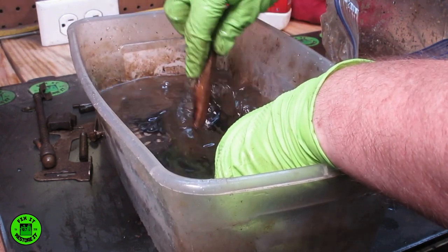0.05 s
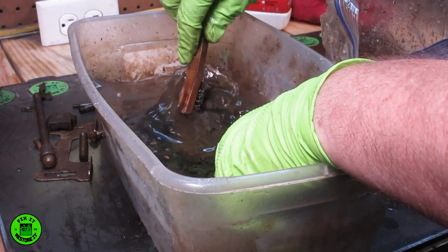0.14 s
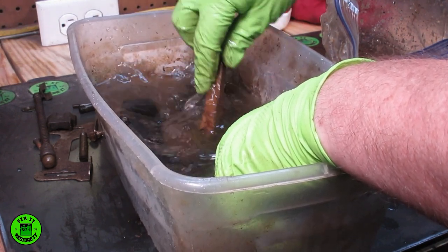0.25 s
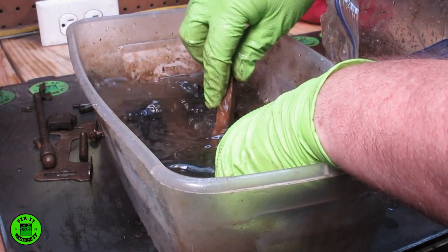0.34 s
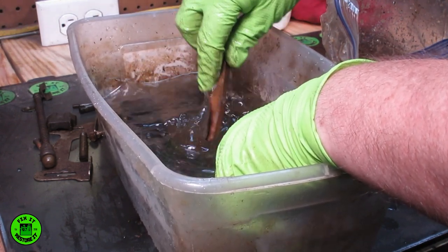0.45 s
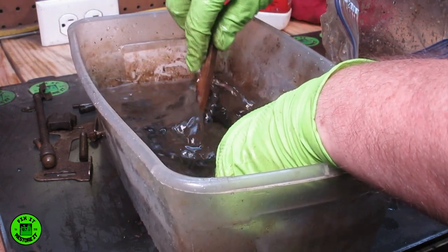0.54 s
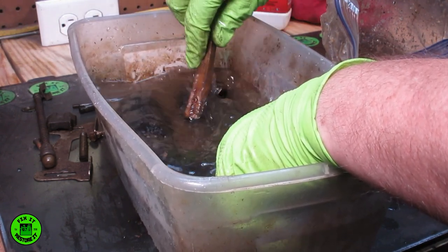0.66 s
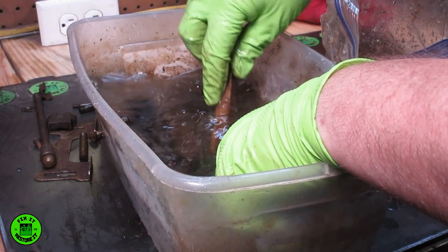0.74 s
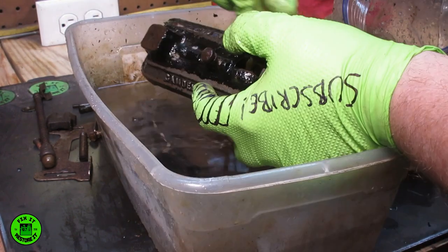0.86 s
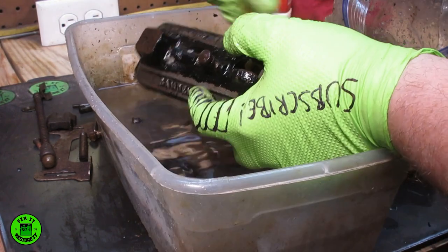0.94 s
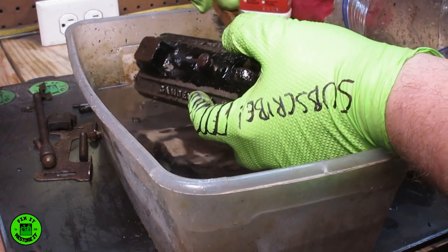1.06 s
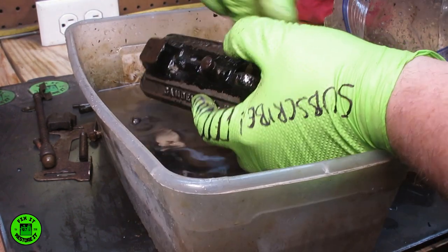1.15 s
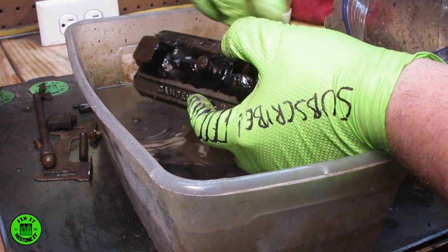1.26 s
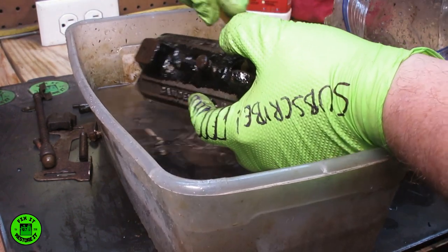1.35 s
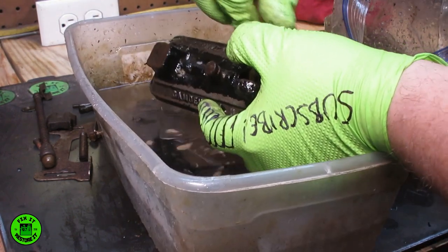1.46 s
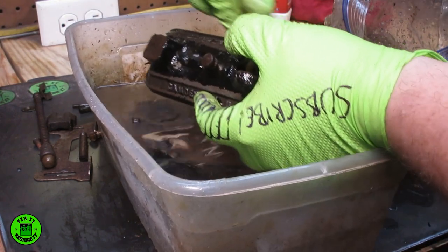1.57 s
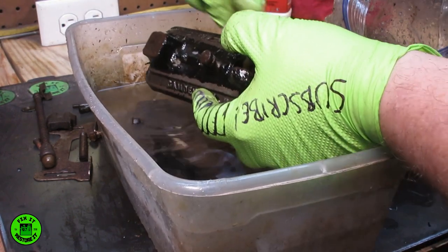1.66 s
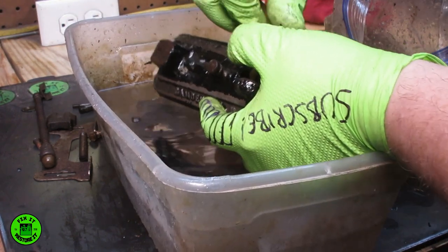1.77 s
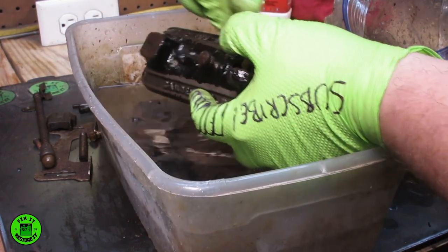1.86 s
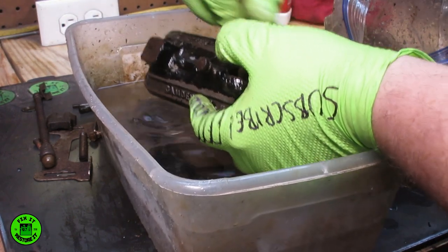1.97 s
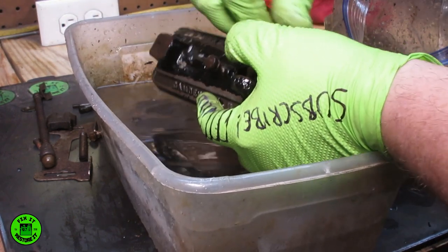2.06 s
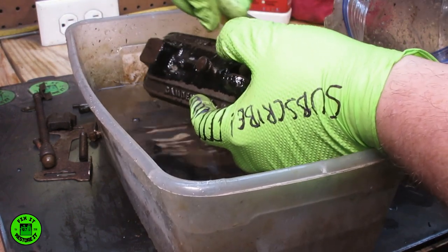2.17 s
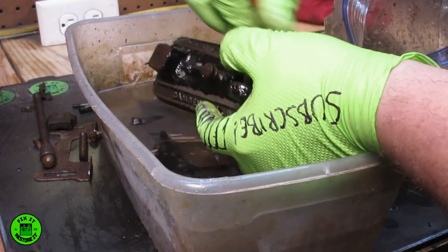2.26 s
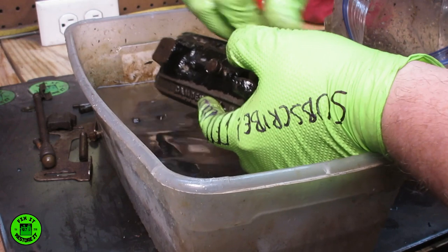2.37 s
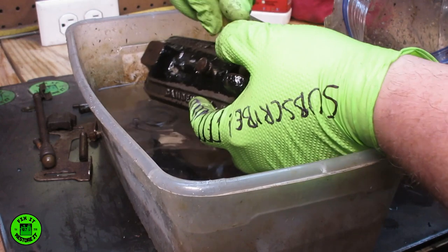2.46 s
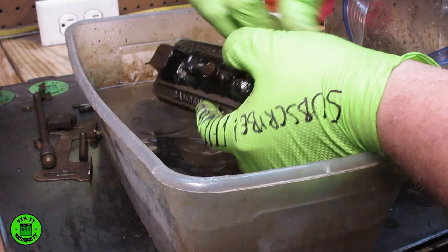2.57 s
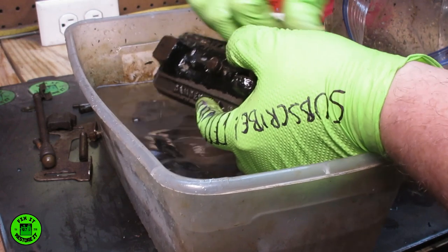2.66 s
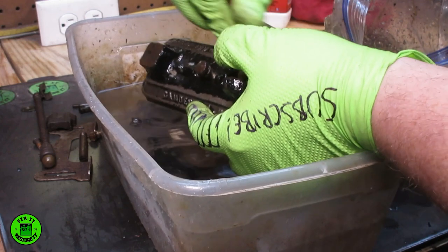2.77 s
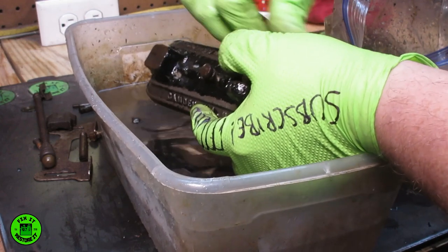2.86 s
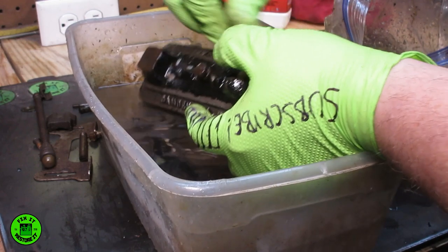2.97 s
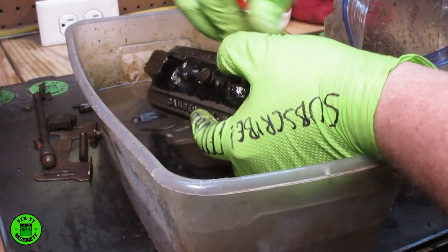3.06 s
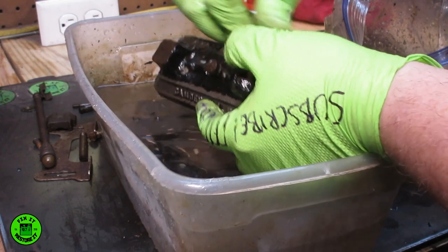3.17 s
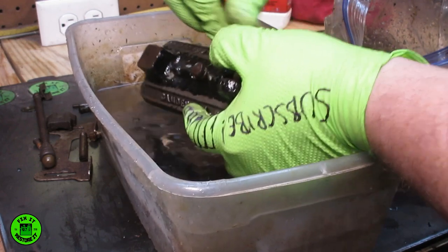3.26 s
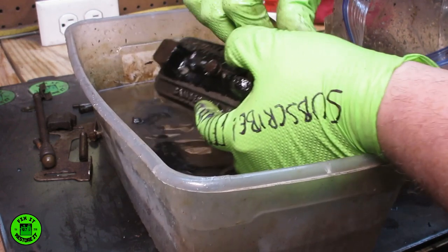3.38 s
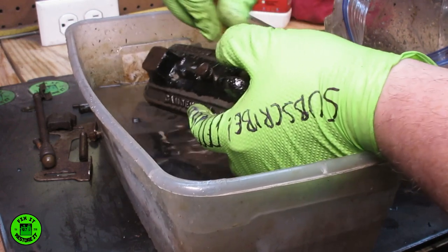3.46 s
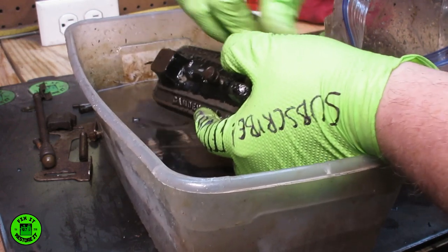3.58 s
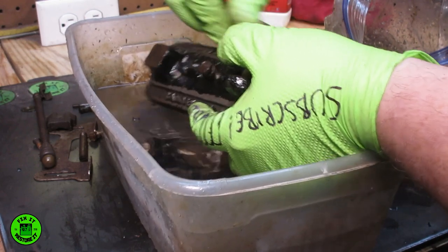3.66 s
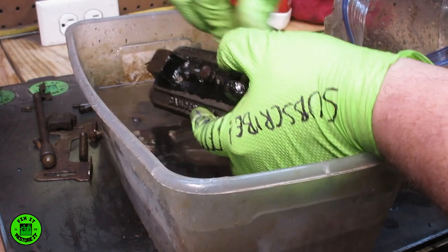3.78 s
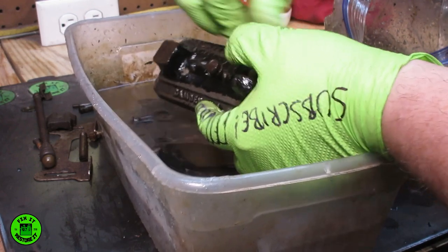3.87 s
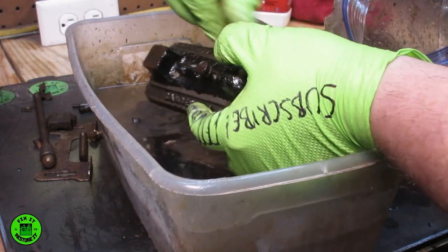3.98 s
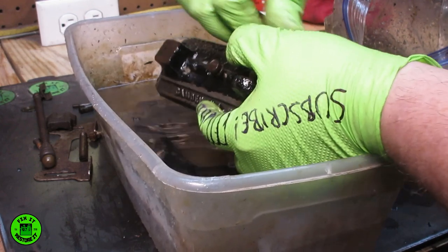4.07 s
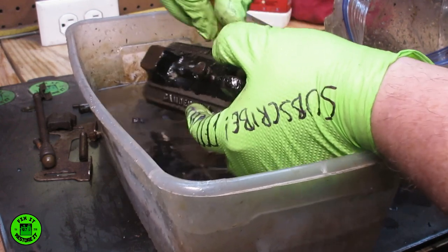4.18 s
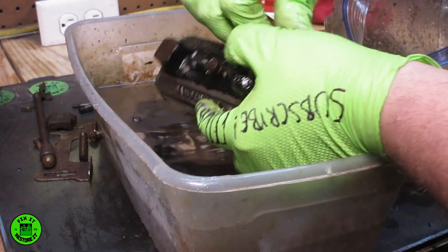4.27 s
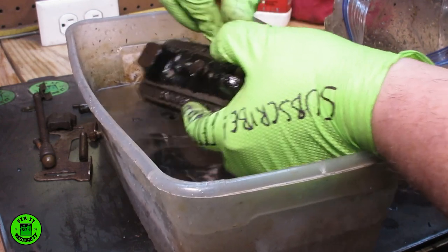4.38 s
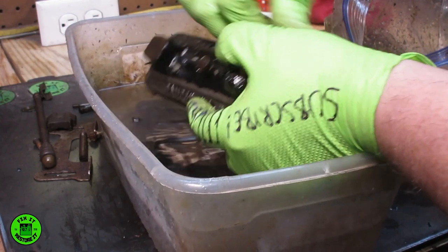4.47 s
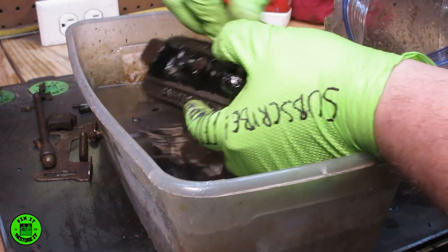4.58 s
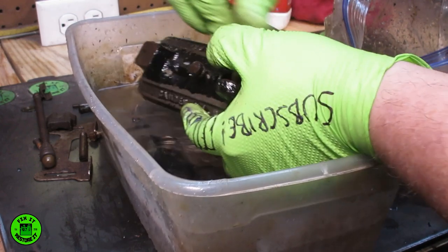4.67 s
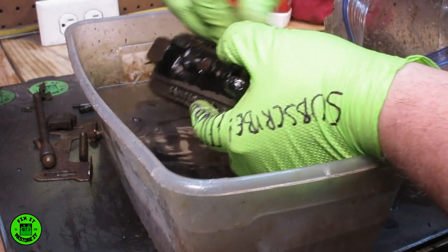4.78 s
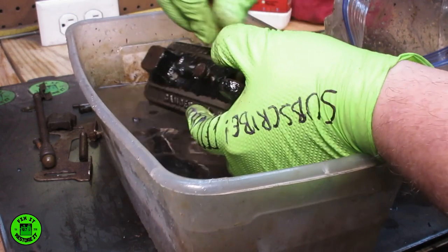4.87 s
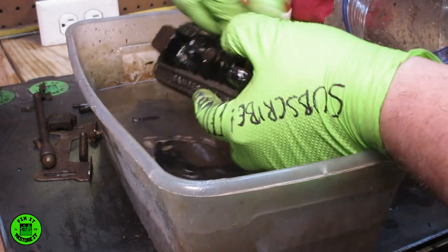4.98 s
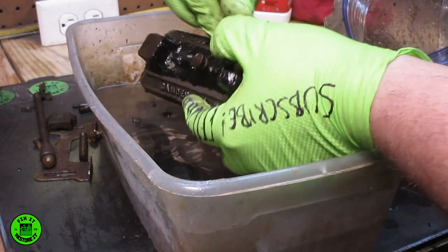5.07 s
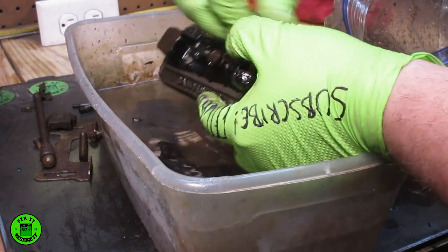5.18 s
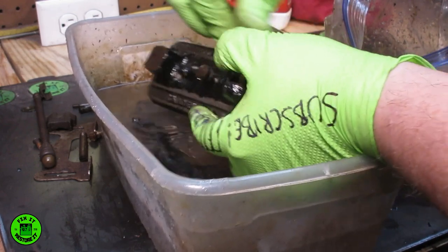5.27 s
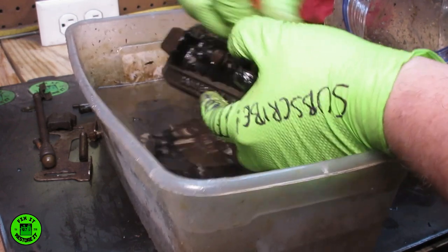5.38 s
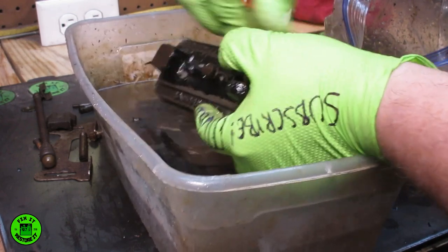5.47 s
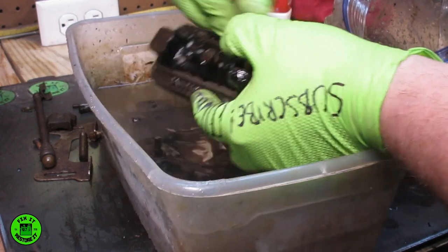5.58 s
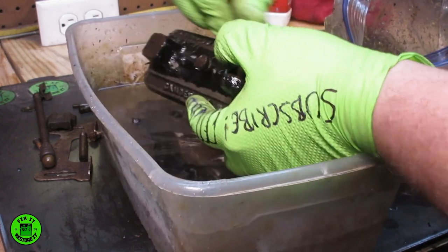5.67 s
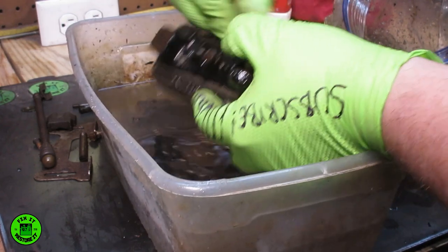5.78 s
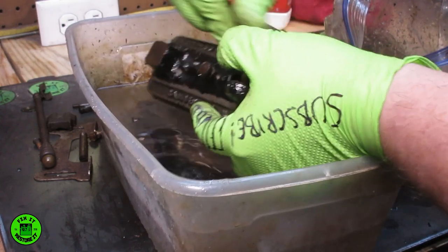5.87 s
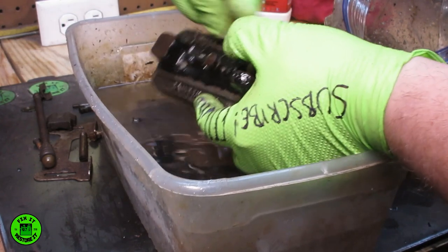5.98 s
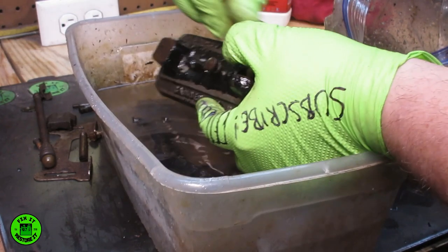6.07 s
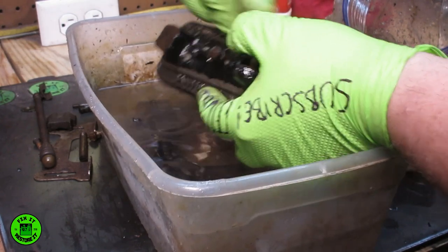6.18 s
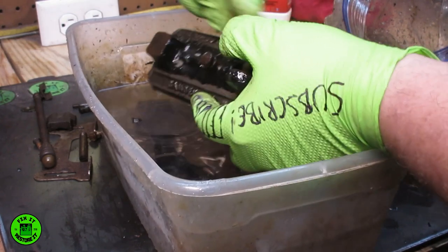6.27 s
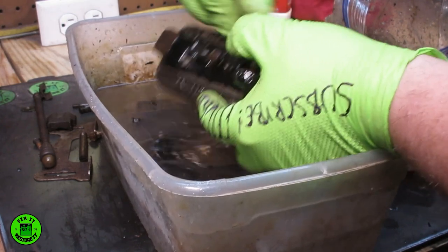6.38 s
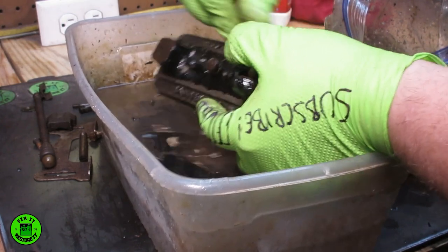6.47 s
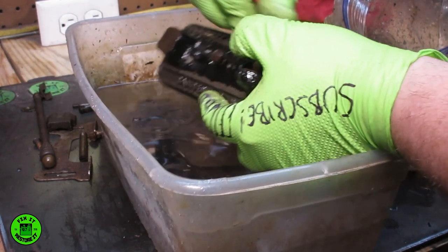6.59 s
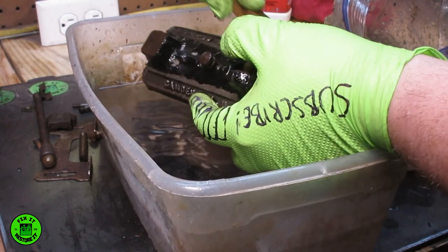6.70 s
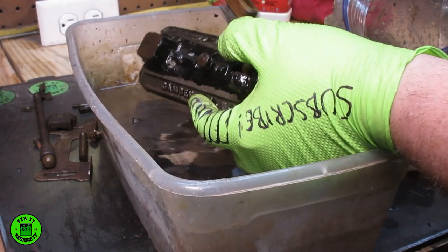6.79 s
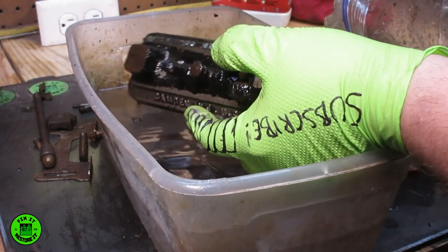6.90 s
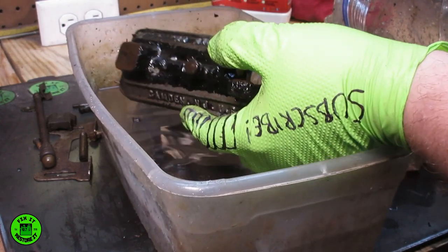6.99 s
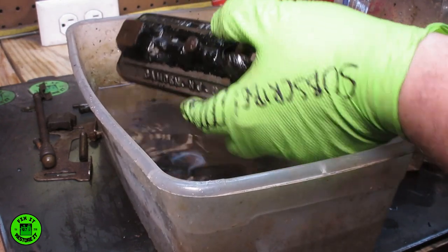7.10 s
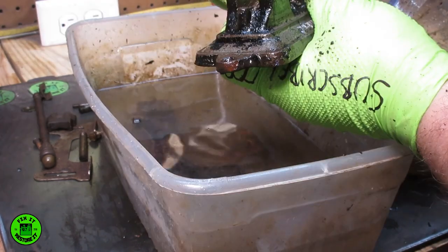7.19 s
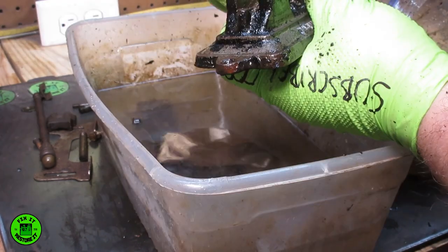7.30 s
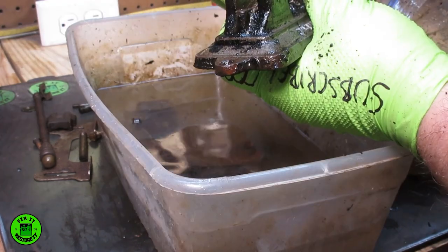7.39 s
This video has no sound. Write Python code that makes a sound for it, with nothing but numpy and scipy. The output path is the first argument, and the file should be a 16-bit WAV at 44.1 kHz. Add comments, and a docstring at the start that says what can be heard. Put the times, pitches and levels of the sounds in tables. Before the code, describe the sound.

Muffled underwater brushing and bubbles, a dull splash, then crisp wet bristles rasping to and fro on metal, ever quicker, ending in near silence.

```python
"""Dead-sounding workshop: a stiff brush scrubs a metal part in a plastic tub of water, close to one microphone.
Five muffled strokes run under water: filtered bristle clicks, with bubbles and gliding noise resonances as gurgles.
The part is lifted with a dull splash; the bristles slap onto it and rasp to and fro, brighter, quickening to
about ten strokes a second. Noise bursts make slaps, snaps and flips; decaying sines make the part's ring and drips.
Short echoes and a steady noise background complete it."""
import sys
import numpy as np
from scipy import signal
from scipy.fft import rfft, irfft
from scipy.io import wavfile
from scipy.ndimage import uniform_filter1d

SR = 44100
rng = np.random.default_rng(int(sys.argv[2]) if len(sys.argv) > 2 else 0)


def inscribe(sig):
    """Save sig as 16-bit PCM at rate SR to the path in sys.argv[1].

    A 1-D sig is mono; a 2-D sig holds one channel per row.
    Samples are clipped to [-1, 1] before scaling.
    """
    pcm = np.round(np.clip(np.atleast_2d(sig).T, -1, 1) * 32767)
    wavfile.write(sys.argv[1], SR, pcm.astype(np.int16))


N = 328094
TIME_S = np.arange(N) / SR

# workshop background spectrum: (frequency [Hz], relative level [dB])
FLOOR = [(25, -17), (50, -0.5), (80, -6.5), (113, 1.5), (150, -7), (240, -4.5), (330, -11.5), (520, -11),
         (1000, -13.5), (2000, -19.5), (3000, -19.5), (5000, -26.5), (8000, -29), (15000, -39)]
# strokes under water, each lasting until the next: (start time [s], relative mid-stroke level [dB])
STROKES_IN_WATER = [(-0.08, -33.5), (0.066, -33), (0.234, -31.5), (0.481, -33), (0.691, -32.5)]
# rasp spectra: (frequency [Hz], relative level [dB])
RASP_IN_WATER = [(120, -29), (250, -12), (500, -14.5), (1100, -11.5), (1700, -11), (2600, -3.5),
                 (3800, -5.5), (6000, -7.5), (8500, 0), (11000, -6), (15000, -16)]
RASP_IN_AIR = [(200, -28), (600, -26), (1100, -19.5), (1700, -14.5), (2200, -12.5), (2800, -6.5),
               (3600, -8.5), (4500, -4.5), (6000, -3), (7700, -0.5), (10000, -2.5), (12000, -4.5),
               (15000, -12)]
# resonances of the filled tub and of the metal part: (centre [Hz], width [Hz], lift [dB])
TUB_RESONANCES = [(927, 81, 16.5), (1170, 72, 14.5), (1340, 85, 13), (2480, 120, 6.5), (2770, 190, 4.5),
                  (3400, 70, 2), (4720, 160, 6)]
PART_RESONANCES = [(1427, 96, 4.9), (2557, 25, 5.6), (3190, 50, 5.2), (4070, 180, 5.5), (4666, 70, 4.8),
                   (4904, 380, 4.3), (5395, 76, 4), (5910, 97, 3.6), (7150, 74, 5.7), (7230, 70, 1.46),
                   (8270, 177, 1.87), (9550, 150, 3.1)]
# largest air pockets, churned up in the water or squeezed from the wet bristles:
# (time [s], length [s], relative rms level [dB], first pitch [Hz], last pitch [Hz])
GURGLES = [(0, 0.0174, -31, 2300, 2300), (0.287, 0.048, -40, 1500, 2380), (0.325, 0.012, -27.5, 2900, 2370),
           (0.342, 0.039, -37.5, 1890, 1090), (0.368, 0.041, -36, 1100, 2000),
           (0.811, 0.055, -30.5, 2750, 2000), (0.85, 0.039, -32, 2300, 2400),
           (0.876, 0.014, -25.5, 2540, 1860), (0.913, 0.0097, -35.5, 2350, 2300),
           (2.427, 0.017, -43, 2280, 2080), (2.719, 0.0156, -40, 2210, 2320),
           (4.764, 0.02, -33.5, 2250, 2130)]
# a tuft of bristles catches on an edge of the part and snaps free: (time [s], relative peak level [dB])
SNAPS = [(0.2484, -14), (1.3294, -14.5), (2.729, -5), (2.9017, -12), (3.2455, -13.5), (3.3646, -18),
         (4.8229, -8), (5.6531, -10), (6.054, -9)]
# scrubs on the lifted part, a push and a pull each, lasting until the next:
# (start time [s], relative push level [dB], relative pull level [dB])
SCRUBS = [(0.991, -24, -24.5), (1.306, -24, -26), (1.589, -23.5, -24.1), (1.857, -23.5, -27),
          (2.138, -20, -23), (2.416, -19.7, -22), (2.702, -19.5, -24), (2.967, -19, -22),
          (3.219, -21, -22.8), (3.462, -17.5, -21.5), (3.695, -19.5, -21), (3.921, -20, -20.5),
          (4.147, -20.4, -20.2), (4.374, -19.5, -21), (4.584, -19, -21.3), (4.803, -17.5, -19.5),
          (5.024, -18.5, -20.2), (5.225, -18, -21.5), (5.434, -17.6, -19), (5.638, -19.0, -20.5),
          (5.839, -18.5, -23.3), (6.031, -20, -21.5), (6.246, -21.5, -22.5), (6.439, -21, -22.5)]
# stroke shapes per direction, as pairs (at slow pace, at fast pace): top, place of top speed [0-1];
# firmness, how early the full rasp is reached [-]; dwell, lingering at the turns [-];
# turn_db, rustle at stroke start against the stroke [dB]; body_db, sheen_db, lows and highs against the middle [dB]
PUSH = dict(turn_db=(-25, -15), top=(0.66, 0.43), firmness=(0.87, 1.21), dwell=(1, 1.24),
        body_db=(-14.5, -16), sheen_db=(7, 7))
PULL = dict(turn_db=(-19, -14.5), top=(0.4, .51), firmness=(0.76, .3), dwell=(1.05, 1),
        body_db=(-10.5, -11.5), sheen_db=(4.5, 6.5))
# last light push, peaking early: start_s, stop_s, ease_off_s [s]; level_db [dB]; top, place of top speed [0-1]
LAST_PUSH = dict(start_s=6.648, stop_s=6.82, level_db=-26, top=0.34, ease_off_s=.06)
# lowest modes of the part, rung by the rubbing: (frequency [Hz], relative level [dB], ring time [s])
RING = [(1415, 1, .06), (2545, -3.5, .055), (3200, -3, .055)]
# drips from the lifted part: (time [s], peak level [dB], pitch [Hz], ring time [s])
DRIPS = [(6.929, -44, 4400, .012), (7.208, -40, 9000, .0015)]

LIFT_S = 0.93  # last stroke under water ends
SLOW_STROKES_PER_S, FAST_STROKES_PER_S = 6.2, 10.48
PUSH_SHARE = 0.5  # of the time of one scrub
FLIP_DELAY_S, FLIP_DB = 0.029, -19.5  # after each turn; level against the stroke
BAND_EDGE_HZ = 15080


def amp(db):
    """Decibels to gain."""
    return 10 ** (np.asarray(db) / 20)


def evened(x):
    """Scales to rms 1."""
    return x / np.sqrt(np.mean(x ** 2) + 1e-20)


def add(mix, start_s, sound):
    """Mixes a sound in at start_s, cut at the end of the mix."""
    part = mix[max(round(start_s * SR), 0):][:len(sound)]
    part += sound[:len(part)]


def band(x, low_hz, high_hz, order=12):
    """Keeps one band, with soft edges."""
    hz = np.fft.rfftfreq(N, 1 / SR) + 1
    high_pass = 1 + (low_hz / hz) ** order
    low_pass = 1 + (hz / high_hz) ** order
    return irfft(rfft(x) / high_pass / low_pass, N)


def colour(x, spectrum, resonances=(), size=8192):
    """Minimum-phase filter: smooth spectrum plus resonant peaks that ring on after each click."""
    hz = np.fft.rfftfreq(size, 1 / SR)
    spectrum_hz, spectrum_db = np.transpose(spectrum)
    db = np.interp(np.log(hz + 1), np.log(spectrum_hz), spectrum_db)
    for centre_hz, width_hz, lift_db in resonances:
        db = db + lift_db / (1 + (2 * (hz - centre_hz) / width_hz) ** 2)
    log_gain = np.log(amp(np.r_[db, db[-2:0:-1]]))
    causal_spectrum = np.exp(np.conj(signal.hilbert(log_gain)))
    response = np.fft.ifft(causal_spectrum).real[:size // 2]
    return evened(signal.oaconvolve(x, response)[:N])


def background():
    """Steady workshop noise, shaped by the floor spectrum."""
    return amp(-47) * colour(rng.standard_normal(N), FLOOR)


def flicks(per_s, spread_db):
    """Bristle tips catch and let go: a dense train of clicks of uneven size."""
    boost_db = spread_db * np.minimum(rng.exponential(1, N), 4)
    size = rng.standard_normal(N) * amp(boost_db)
    return size * (rng.random(N) < per_s / SR)


def uneven(depth_db, rate_hz):
    """A gain that wanders by chance, as tufts of bristles grip more or less."""
    return amp(depth_db * evened(band(rng.standard_normal(N), 9.7, rate_hz, order=4)))


def brush_motion(turns_s, shape, ease_off_s):
    """Brush speeds up and stops each stroke: loudness, mid-stroke gain, body, sheen, strokes done."""
    done = np.interp(TIME_S, turns_s, np.arange(len(turns_s)))
    k = np.minimum(done.astype(int), len(turns_s) - 2)
    level_db = shape["level_db"]
    firmness = shape["firmness"][k] + .01
    warp = np.log(.5) / np.log(shape["top"][k])  # puts top speed at "top"
    speed = np.sin(np.pi * (done - k) ** warp) ** 2
    # a firm stroke reaches its full rasp early
    grip = np.tanh(firmness * speed ** shape["dwell"][k]) / np.tanh(firmness)
    rustle_db = np.interp(TIME_S, turns_s[:-1], level_db + shape["turn_db"])
    loudness = amp(level_db[k]) * grip + amp(rustle_db) * (1 - speed)
    touch_down = uniform_filter1d(1. * (TIME_S >= turns_s[0]), size=400)
    ease_off = np.sqrt(np.clip((turns_s[-1] - TIME_S) / ease_off_s, 0, 1))
    loudness = np.abs(loudness * touch_down * ease_off)
    full, body, sheen = (uniform_filter1d(amp(shape[name][k]), size=600)
                         for name in ("level_db", "body_db", "sheen_db"))
    return loudness, full, body, sheen, done


def rasp(grain, motion, body_power, body_db, treble_db, tint_db=.5):
    """Treble follows loudness; body_power below 1 swells the lows earlier and longer; each stroke is tinted."""
    loudness, full, body, sheen, done = motion
    parts = band(grain, 20, 3500), band(grain, 3500, 6500), band(grain, 6500, 20000)
    stroke_tints = amp(tint_db * rng.standard_normal((int(done[-1]) + 1, len(parts))))
    tints = stroke_tints[done.astype(int)].T
    low, middle, high = (evened(part * tint * uneven(depth_db=1.12, rate_hz=32))
                         for part, tint in zip(parts, tints))
    treble = (middle + sheen * high) / np.sqrt(1 + sheen ** 2)
    body_loudness = full * (loudness / full) ** body_power
    return amp(treble_db) * loudness * treble + amp(body_db) * body * body_loudness * low


def bubbles(per_s, low_hz, high_hz, cycles, level_db, count=24):
    """Small bubbles of many sizes ping at random moments, each a decaying sine."""
    t, out = TIME_S[:SR // 20], np.zeros(N)
    pops = rng.uniform(-0.975, 1, N) * (rng.random(N) < per_s / SR)
    kind = rng.integers(0, count, N)
    for k, hz in enumerate(np.geomspace(low_hz, high_hz, count)):
        ping = np.sqrt(hz) * np.exp(-hz * t / cycles) * np.sin(2 * np.pi * hz * t)
        out += signal.oaconvolve(pops * (kind == k), ping)[:N]
    return amp(level_db) * evened(out)


def strokes_in_water():
    """Turn times and stroke shapes under water: all alike but for level."""
    starts_s, level_db = np.transpose(STROKES_IN_WATER)
    common = dict(turn_db=-22.5, top=.53, firmness=1.95, dwell=1.12, body_db=-3.0, sheen_db=0.9)
    shape = {name: np.full(len(starts_s), value) for name, value in common.items()}
    shape["level_db"] = level_db
    return np.r_[starts_s, LIFT_S], shape


def scrub_in_water():
    """Submerged bristles sound through the water and tub walls, and stir up small bubbles."""
    grain = colour(flicks(per_s=7800, spread_db=0.8), RASP_IN_WATER, TUB_RESONANCES)
    motion = brush_motion(*strokes_in_water(), ease_off_s=0.011)
    loudness = motion[0]
    churn = loudness * bubbles(per_s=160, low_hz=450, high_hz=3800, cycles=13, level_db=-12)
    return churn + rasp(grain, motion, body_power=1.0, body_db=-0.7, treble_db=-2.0)


def resonate(x, hz, width_hz):
    """A resonance that follows the curve hz: shift it down to zero, smooth twice, shift back."""
    turn = np.exp(2j * np.pi * np.cumsum(hz) / SR)
    r = np.exp(-np.pi * width_hz / SR)
    smooth = signal.lfilter([(1 - r) ** 2], [1, -2 * r, r * r], x / turn)
    return (turn * smooth).real


def gurgles(relative_width, level_db):
    """Each air pocket rings with the rush of water; its pitch glides as it shrinks or opens."""
    out = np.zeros(N)
    for start_s, length_s, db, first_hz, last_hz in GURGLES:
        hz = np.geomspace(first_hz, last_hz, round(length_s * SR))
        ring = resonate(rng.standard_normal(len(hz)), hz, relative_width * hz.mean())
        faded = ring * signal.windows.tukey(len(hz), .5)
        add(out, start_s, amp(db + level_db) * evened(faded))
    return out


def strokes_in_air():
    """Pushes and pulls alternate; pace sets their shape, and faster strokes leave shallower gaps."""
    scrubs = np.array(SCRUBS)
    push_s = np.r_[scrubs[:, 0], LAST_PUSH["start_s"]]
    pull_s = push_s[:-1] + PUSH_SHARE * np.diff(push_s)
    turns_s = np.sort(np.r_[push_s, pull_s, LAST_PUSH["stop_s"]])
    strokes_per_s = 1 / np.diff(turns_s)
    pulling = np.arange(len(turns_s) - 1) % 2

    def at_pace(pair):
        """Interpolates a (slow, fast) pair at each stroke's pace."""
        return np.interp(strokes_per_s, [SLOW_STROKES_PER_S, FAST_STROKES_PER_S], pair)

    shape = {name: np.where(pulling, at_pace(PULL[name]), at_pace(PUSH[name])) for name in PUSH}
    shape["level_db"] = np.r_[scrubs[:, 1:].ravel(), LAST_PUSH["level_db"]]
    shape["top"][-1] = LAST_PUSH["top"]
    return turns_s, shape


def bristle_bursts(slap_s, slap_db, slap_t60_s, snap_db, snap_t60_s, flip_t60_s):
    """Gain of sudden flick flurries: one slap as the brush lands, brief snaps, a flip after each turn."""
    out, t = np.zeros(N), TIME_S[:SR // 4]
    for start_s, db in SNAPS:
        add(out, start_s, amp(db + snap_db - 60 * t / snap_t60_s))
    add(out, slap_s, amp(slap_db - 60 * t / slap_t60_s))
    turns_s, shape = strokes_in_air()
    for turn_s, db in zip(turns_s[1:], shape["level_db"][1:]):
        add(out, turn_s + FLIP_DELAY_S, amp(db + FLIP_DB - 60 * t / flip_t60_s))
    return out


def plop(start_s, level_db, t60_s, low_hz, high_hz):
    """Water closes with a dull splash where the part leaves it: decaying band noise."""
    age_s = TIME_S - start_s
    splash = evened(band(rng.standard_normal(N), low_hz, high_hz, order=4))
    return (age_s > 0) * amp(level_db - 60 * np.abs(age_s) / t60_s) * splash


def part_ring(motion, level_db, reach, per_s, spread_db):
    """Bristles catch near the end of each push, unevenly from stroke to stroke, and the part rings on."""
    loudness, _, _, _, done = motion
    place = (1 - np.cos(np.pi * done)) / 2  # 1 where a push turns back
    catch = amp(spread_db * rng.random(int(done[-1]) + 1))[done.astype(int)]
    drive = catch * loudness ** .7 * place ** reach * flicks(per_s, spread_db=0.0)
    t = TIME_S[:SR // 2]
    modes = sum(amp(db - 60 * t / t60_s) * np.sin(2 * np.pi * hz * t) for hz, db, t60_s in RING)
    return amp(level_db) * evened(signal.oaconvolve(drive, modes)[:N])


def scrub_in_air():
    """Bristles slap onto the lifted part, rasp over it, squelch and set it ringing; snaps and flips punctuate."""
    grain = colour(flicks(per_s=26000, spread_db=0.82), RASP_IN_AIR, PART_RESONANCES)
    motion = brush_motion(*strokes_in_air(), ease_off_s=LAST_PUSH["ease_off_s"])
    loudness = motion[0]
    bursts = bristle_bursts(slap_s=.9228, slap_db=-23.5, slap_t60_s=0.17,
                            snap_db=-20, snap_t60_s=0.028, flip_t60_s=0.055)
    squelch = loudness * bubbles(per_s=40, low_hz=1690, high_hz=2986, cycles=26, level_db=-27.5)
    ring = part_ring(motion, level_db=-50.5, reach=1.1, per_s=900, spread_db=4)
    strokes = rasp(grain, motion, body_power=0.68, body_db=-2.3, treble_db=-0.43)
    return bursts * grain + squelch + ring + strokes


def drips():
    """Each drop gives one short dying sine ping."""
    out, t = np.zeros(N), TIME_S[:SR // 4]
    for start_s, db, hz, t60_s in DRIPS:
        add(out, start_s, amp(db - 60 * t / t60_s) * np.sin(2 * np.pi * hz * t))
    return out


def reflections(x, t60_s, level_db):
    """Tub and bench return a short, dense cluster of echoes: random decaying taps."""
    t = TIME_S[:SR // 4]
    signs = rng.choice([-1., 1.], len(t))
    sparse = rng.random(len(t)) < 4000 / SR  # 4000 echoes per second
    taps = signs * sparse * (t > .001) * amp(-60 * t / t60_s)
    wet = amp(level_db)
    echoes = signal.oaconvolve(x, taps / np.linalg.norm(taps))[:N]
    return (x + wet * echoes) / np.sqrt(1 + wet ** 2)


def scene():
    """Brush, part and water over the steady background, the same in both channels."""
    brush = scrub_in_water() + scrub_in_air()
    water = gurgles(relative_width=0.26, level_db=-0.5) + drips()
    water += plop(start_s=.887, level_db=-28, t60_s=0.095, low_hz=220, high_hz=1310)
    mono = reflections(brush + water, t60_s=0.12, level_db=-12) + background()
    return np.array([mono, mono])


def record(dry):
    """A steep low-pass at the band edge."""
    low_pass = signal.firwin(1023, BAND_EDGE_HZ, window=("kaiser", 9), fs=SR)
    return signal.oaconvolve(dry, low_pass[None], "same")


dry = scene()
out = record(dry)
inscribe(out)
```